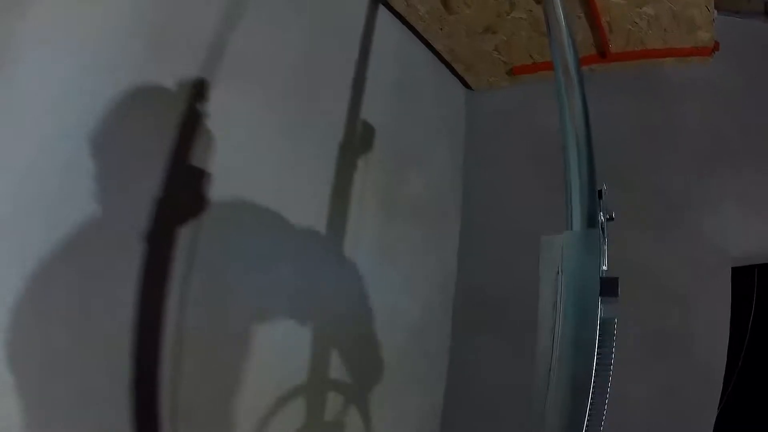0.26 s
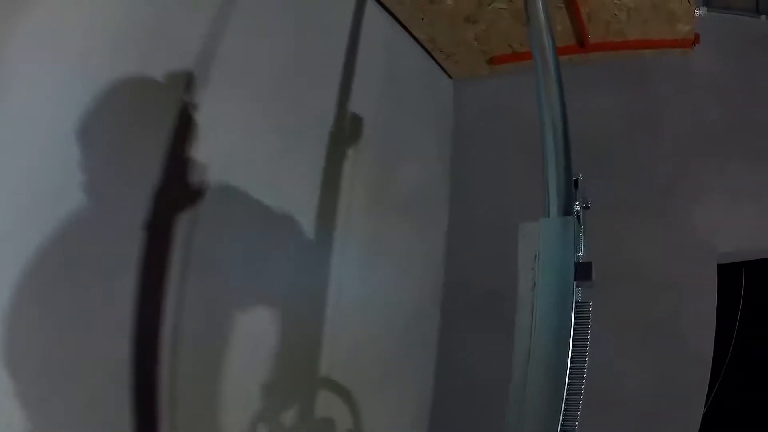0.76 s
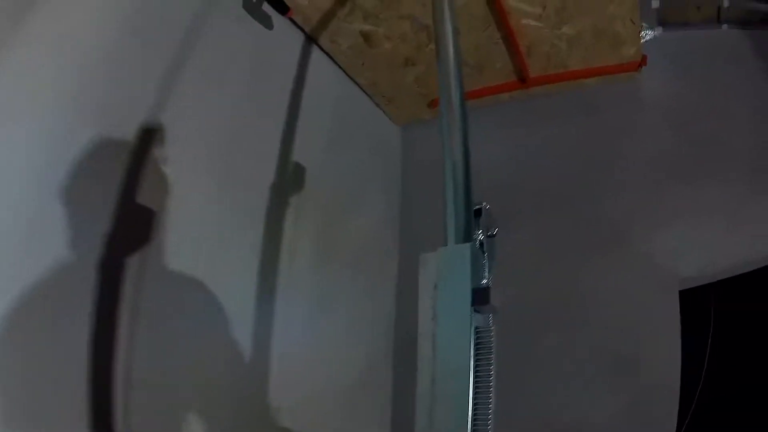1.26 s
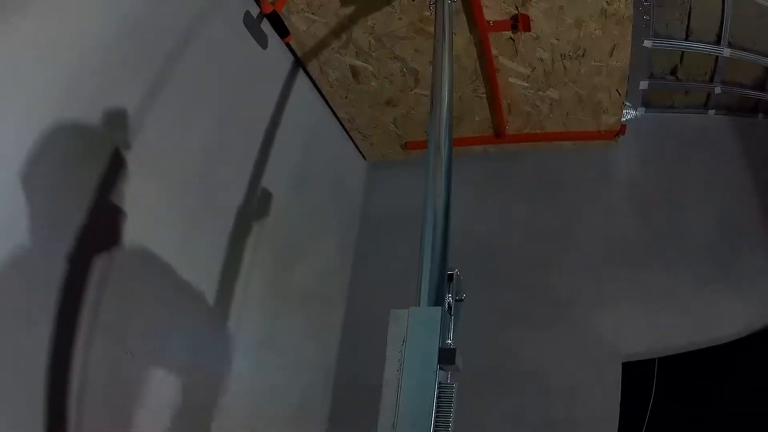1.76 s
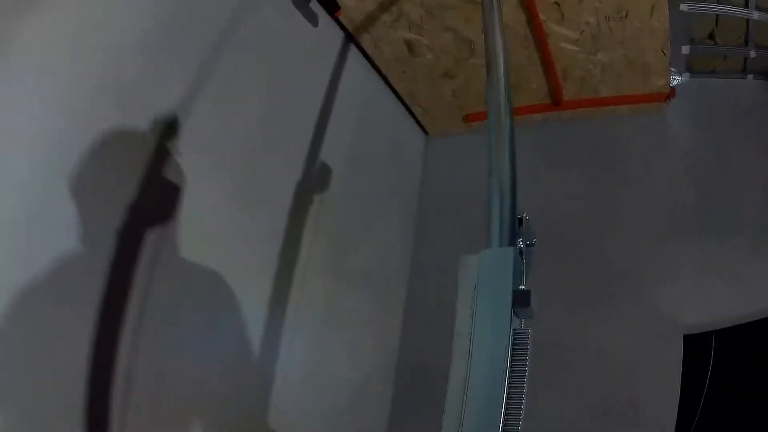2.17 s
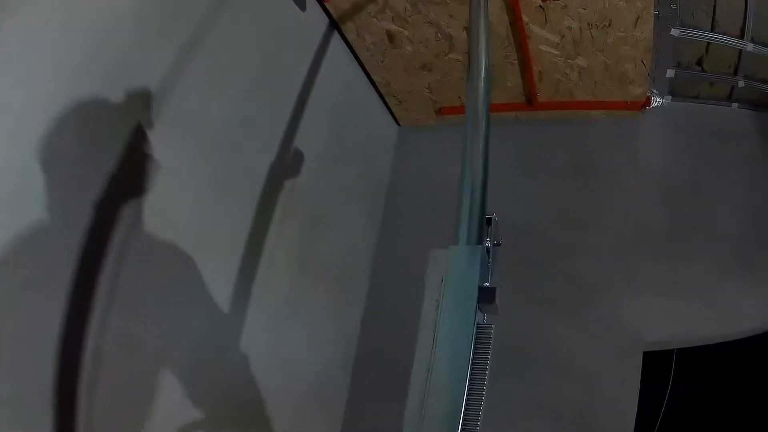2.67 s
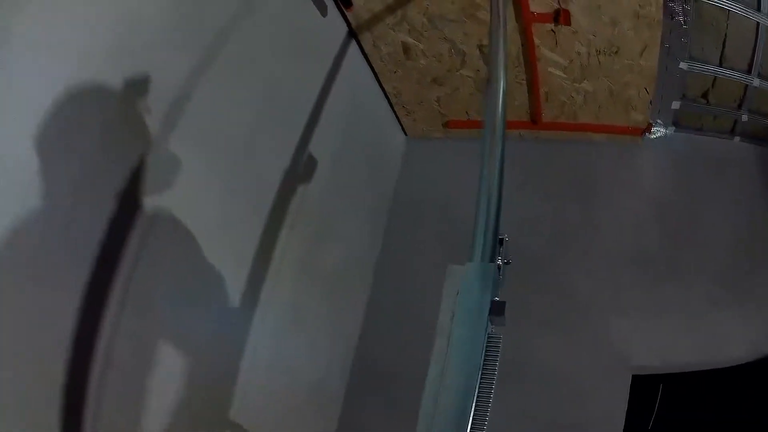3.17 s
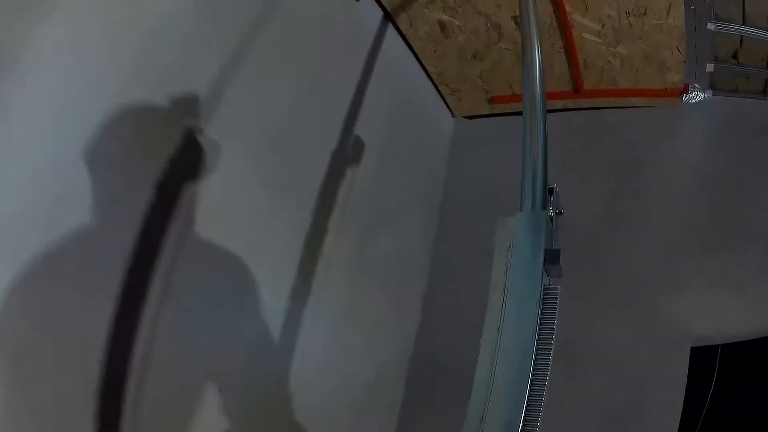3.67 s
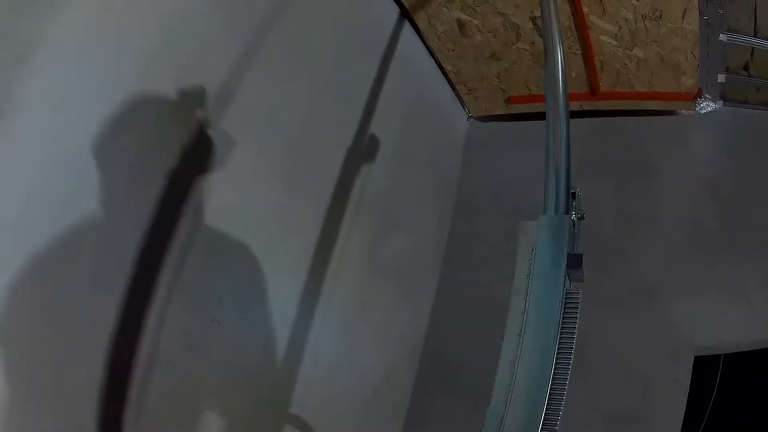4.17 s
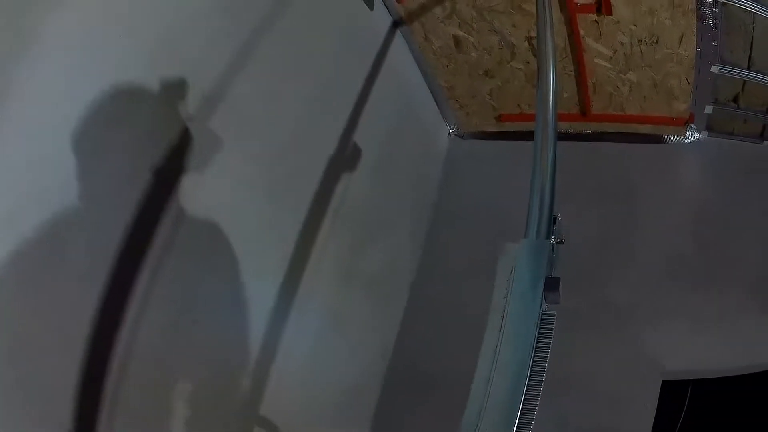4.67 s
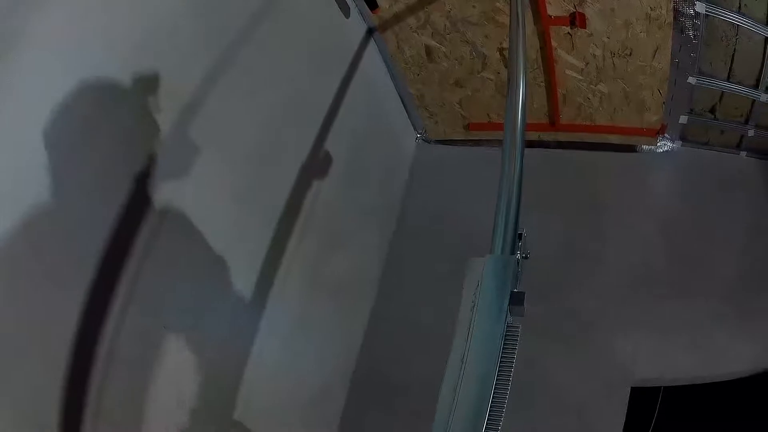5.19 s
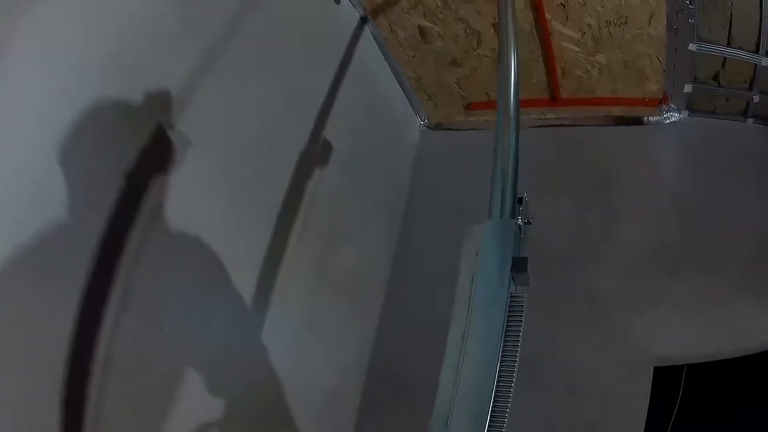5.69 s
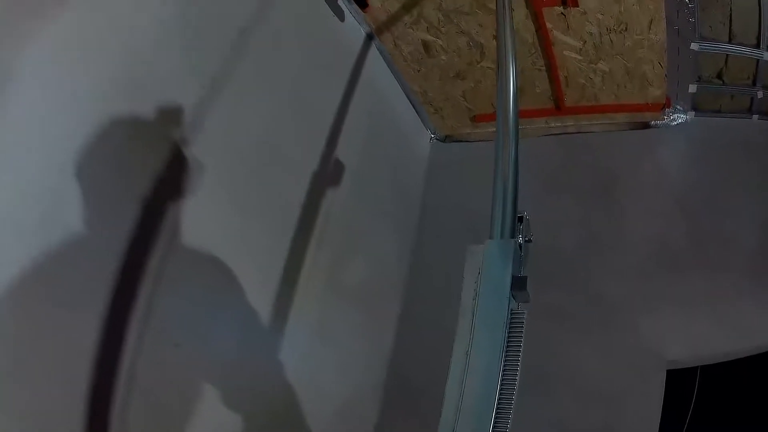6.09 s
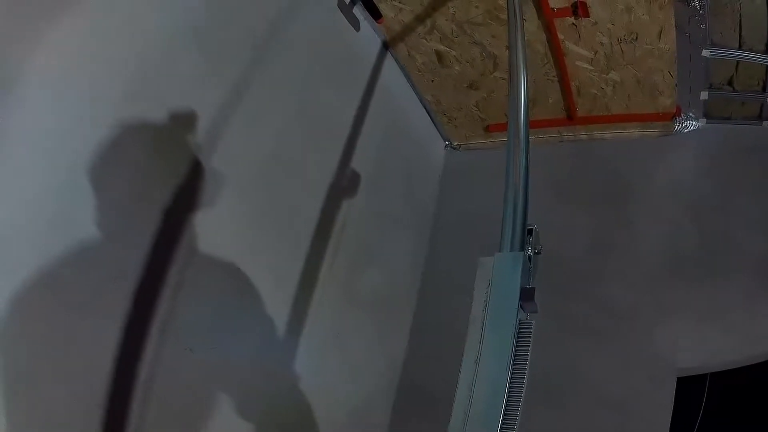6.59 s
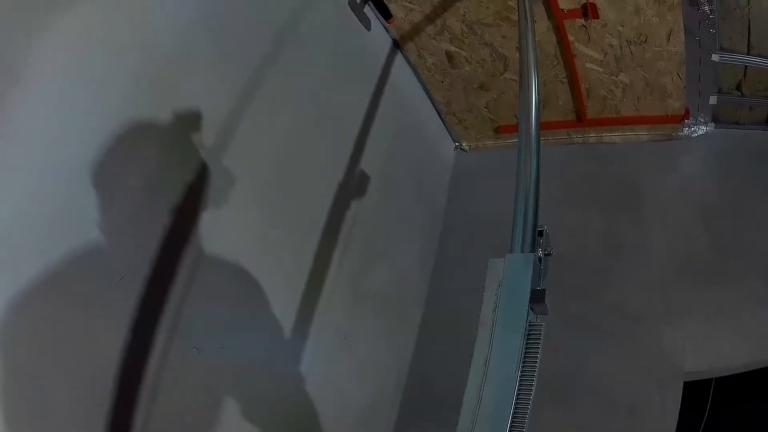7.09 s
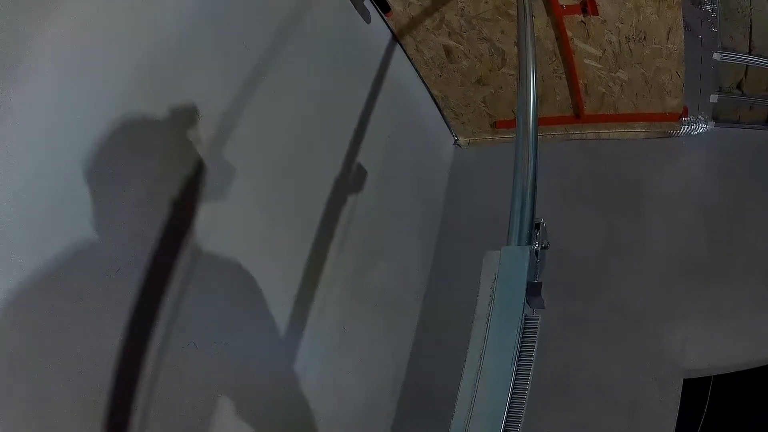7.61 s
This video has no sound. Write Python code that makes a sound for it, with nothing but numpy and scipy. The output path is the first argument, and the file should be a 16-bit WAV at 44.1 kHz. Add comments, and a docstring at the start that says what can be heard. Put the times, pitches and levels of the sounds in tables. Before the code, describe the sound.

Fast, ringing steel clicks come from the ratchet of a hand-cranked panel lift, with a rattling clack from its mast that gradually grows thinner. The long run stops, a few metal parts knock and the lift hums briefly, then the ratchet runs once more for a moment. Bare garage walls echo the metal sounds. The ending is quiet, with light ticks, sleeves brushing near the microphone and dull bumps of hands.

```python
"""A panel lift's hand winch, cranked in a bare garage: one long run, one short.
At each ratchet tooth the steel pawl and wheel ring, the mast clacks and its tube taps the sleeve.
The clack thins as the mast runs out. Loose parts knock, the bumped frame hums and small ticks sound.
The walls reverberate these; thumps of hands, rubbing cloth and faint air noise stay dry."""
import sys
import numpy as np
from scipy import signal
from scipy.fft import rfft, irfft, next_fast_len
from scipy.io import wavfile

SR = 44100
rng = np.random.default_rng(int(sys.argv[2]) if len(sys.argv) > 2 else 0)


def bounce(signal):
    """Save signal as a 16-bit WAV file at the path given by the first command-line argument."""
    frames = np.transpose(np.atleast_2d(signal))
    limited = np.clip(frames, -1, 1)
    pcm = np.round(limited * 32767).astype(np.int16)
    wavfile.write(sys.argv[1], SR, pcm)


N = 346185

# Still air spectrum: f/Hz, level/dB
AIR_SPECTRUM = [(30, -5), (200, -14), (750, -15), (1500, -22.5), (15500, -28)]
# Pawl drops; the landing spot sets what rings most: t/s, lower wheel mode/dB, upper mode/dB, pawl/dB
PAWL_DROPS = [(0.002, -35.0, -33.0, -30.0), (0.035, -24.0, -35.0, -30.0), (0.09, -34.0, -19.0, -27.0),
              (0.135, -39.0, -32.0, -39.0), (0.159, -32.0, -20.0, -29.0), (0.206, -31.0, -28.0, -26.0),
              (0.257, -42.0, -26.0, -36.0), (0.293, -27.0, -19.0, -24.0), (0.328, -26.0, -27.0, -39.0),
              (0.382, -45.0, -29.0, -26.0), (0.407, -23.0, -37.0, -23.0), (0.47, -28.0, -39.0, -28.0),
              (0.506, -24.0, -33.0, -34.0), (0.536, -44.0, -36.0, -31.0), (0.575, -29.0, -33.0, -24.0),
              (0.602, -27.0, -26.0, -28.0), (0.633, -44.0, -28.0, -36.0), (0.666, -19.0, -25.0, -38.0),
              (0.704, -26.0, -31.0, -33.0), (0.749, -33.0, -46.0, -22.0), (0.778, -32.0, -23.0, -21.0),
              (0.849, -45.0, -23.0, -29.0), (0.876, -39.0, -45.0, -31.0), (0.91, -35.0, -45.0, -25.0),
              (0.94, -44.0, -26.0, -24.0), (0.972, -43.0, -26.0, -28.0), (1.036, -40.0, -22.0, -30.0),
              (1.065, -27.0, -22.0, -33.0), (1.102, -31.0, -35.0, -27.0), (1.133, -45.0, -35.0, -27.0),
              (1.175, -44.0, -33.0, -25.0), (1.201, -26.0, -38.0, -25.0), (1.225, -38.0, -45.0, -27.0),
              (1.254, -44.0, -46.0, -30.0), (1.279, -28.0, -33.0, -34.0), (1.322, -45.0, -38.0, -26.0),
              (1.355, -31.0, -36.0, -46.0), (1.387, -40.0, -41.0, -30.0), (1.416, -37.0, -29.0, -41.0),
              (1.536, -35.0, -23.0, -29.0), (1.566, -45.0, -45.0, -30.0), (1.607, -30.0, -28.0, -35.0),
              (1.653, -44.0, -44.0, -32.0), (1.703, -34.0, -31.0, -36.0), (1.763, -32.0, -24.0, -28.0),
              (1.81, -42.0, -35.0, -43.0), (1.848, -29.0, -31.0, -34.0), (1.894, -29.0, -22.0, -46.0),
              (1.947, -25.0, -27.0, -33.0), (1.997, -29.0, -30.0, -29.0), (2.056, -23.0, -24.0, -34.0),
              (2.112, -18.0, -21.0, -29.0), (2.154, -29.0, -23.0, -35.0), (2.201, -44.0, -27.0, -28.0),
              (2.229, -44.0, -40.0, -26.0), (2.254, -44.0, -31.0, -30.0), (2.288, -44.0, -41.0, -29.0),
              (2.315, -26.0, -28.0, -32.0), (2.351, -33.0, -20.0, -31.0), (2.395, -40.0, -31.0, -39.0),
              (2.432, -27.0, -25.0, -23.0), (2.473, -30.0, -25.0, -29.0), (2.516, -38.0, -34.0, -29.0),
              (2.562, -45.0, -28.0, -32.0), (2.588, -40.0, -46.0, -32.0), (2.611, -29.0, -38.0, -32.0),
              (2.648, -28.0, -28.0, -42.0), (2.702, -24.0, -30.0, -29.0), (2.732, -44.0, -39.0, -23.0),
              (2.765, -33.0, -26.0, -28.0), (2.807, -42.0, -26.0, -34.0), (2.846, -37.0, -28.0, -43.0),
              (2.888, -31.0, -28.0, -27.0), (2.921, -36.0, -22.0, -29.0), (2.951, -25.0, -22.0, -46.0),
              (2.98, -40.0, -30.0, -35.0), (3.022, -29.0, -26.0, -35.0), (3.05, -29.0, -28.0, -34.0),
              (3.082, -37.0, -29.0, -23.0), (3.124, -24.0, -28.0, -33.0), (3.151, -26.0, -32.0, -27.0),
              (3.194, -28.0, -33.0, -36.0), (3.23, -26.0, -26.0, -30.0), (3.281, -29.0, -31.0, -45.0),
              (3.311, -26.0, -26.0, -33.0), (3.353, -25.0, -42.0, -28.0), (3.399, -24.0, -33.0, -41.0),
              (3.438, -24.0, -29.0, -28.0), (3.479, -45.0, -45.0, -33.0), (3.518, -43.0, -33.0, -33.0),
              (3.555, -39.0, -35.0, -28.0), (3.58, -21.0, -20.0, -33.0), (3.605, -22.0, -24.0, -29.0),
              (3.641, -25.0, -27.0, -30.0), (3.674, -44.0, -29.0, -23.0), (3.701, -42.0, -34.0, -28.0),
              (3.738, -27.0, -25.0, -44.0), (3.764, -25.0, -29.0, -37.0), (3.811, -44.0, -41.0, -40.0),
              (3.836, -45.0, -45.0, -31.0), (3.863, -46.0, -42.0, -28.0), (3.905, -45.0, -40.0, -35.0),
              (5.097, -43.0, -36.0, -38.0), (5.139, -45.0, -35.0, -34.0), (5.168, -45.0, -42.0, -24.0),
              (5.202, -37.0, -44.0, -30.0), (5.229, -42.0, -45.0, -29.0), (5.254, -45.0, -45.0, -21.0),
              (5.279, -41.0, -46.0, -44.0), (5.302, -41.0, -33.0, -27.0), (5.327, -45.0, -46.0, -21.0),
              (5.349, -32.0, -26.0, -44.0), (5.373, -35.0, -39.0, -29.0), (5.399, -34.0, -46.0, -45.0),
              (5.424, -43.0, -33.0, -25.0), (5.451, -33.0, -30.0, -28.0), (5.477, -40.0, -41.0, -30.0),
              (5.511, -46.0, -46.0, -45.0), (5.535, -45.0, -32.0, -27.0), (5.56, -38.0, -35.0, -30.0)]
# Pawl overtones: f/Hz, level/dB, t60/s
PAWL_OVERTONES = [(6762, -30.5, .07), (7145, -32, .07), (9900, -31, .085), (10400, -36.5, .04),
                  (11820, -42.5, .09), (14720, -49, .07)]
# Mast run-out: t/s, share of raised timbre/0-1
MAST_EXTENSION = [(1.9, 0), (2.8, .25), (3, .55), (5.1, 1)]
# Hand force on the crank: t/s, level/dB
CRANK_EFFORT = [(0, -2.5), (.2, -1.3), (.4, 2.5), (.55, -.7), (.8, -2.3), (1, -1.3), (1.15, 2.2),
                (1.42, -2.3), (1.54, 2.7), (1.7, -3.5), (1.8, 1), (2.22, 1.3), (2.36, -1.3), (2.7, 2.2),
                (2.95, -2), (3.55, 1), (3.92, -.5), (5.1, -6), (5.17, -.5)]
# Clack spectrum, mast low: f/Hz, level/dB
LOW_MAST_SPECTRUM = [(40, -20), (90, -9.5), (160, -4.5), (260, -17), (620, -9.5), (770, -4.5), (1400, -4),
                     (2700, -5.5), (5400, -3.5), (8800, -17), (11000, -23), (15500, -36)]
# Clack spectrum, mast raised: f/Hz, level/dB
HIGH_MAST_SPECTRUM = [(130, -23), (450, -23), (950, -9), (1900, -15.5), (3400, -10.5), (5400, -13),
                      (8800, -26), (15500, -47)]
# Mast's outer sleeve: f/Hz, level/dB, t60/s
SLEEVE_MODES = [(765, -2, .09), (1040, -6, .08), (1374, -4, .08), (1813, -6, .08), (2681, -6, .1)]
# Mast's free length: f/Hz, level/dB, t60/s
TUBE_MODES = [(2255, 0, .03), (3520, -5, .04)]
# Garage reverberation: f/Hz, t60/s
GARAGE_DECAY = [(100, .58), (1500, .52), (5000, .45), (10000, .36), (15000, .14)]
# Hand and body contacts: t/s, relative level/dB, centre f/Hz, t60/s
BODY_THUMPS = [(.412, -43, 127.2, 0.27), (1.21, -51.5, 100, 0.8), (4.251, -50, 93, 0.8),
               (6.734, -50, 121, 0.51), (7.305, -36, 138, 0.31), (7.576, -43, 105, 0.69),
               (7.826, -40.5, 138, 0.24)]
# Loose parts colliding: t/s, level/dB, centre f/Hz, t60/s
PART_KNOCKS = [(1.919, -26, 1100, 0.13), (2.529, -36, 455, 0.16), (3.956, -38, 380, 0.06),
               (4.036, -28, 2320, 0.033), (4.38, -50, 1520, .11), (4.808, -33, 2800, 0.11),
               (4.815, -39, 800, .13), (5.583, -28.5, 280, 0.045), (5.849, -49, 652, 0.16),
               (7.834, -38.5, 3480, 0.064)]
# Frame swaying on one low mode: t/s, level/dB, f/Hz, t60/s
FRAME_HUMS = [(1.921, -41, 165, .35), (4.749, -48, 163, .3)]
# Bumped frame: f/Hz, level/dB, t60/s
FRAME_MODES = [(161, -1, .15), (277, -14, .16), (441, -16, .2), (958, -13, .15), (1017, -16, .15),
               (2625, -15, .33)]
# Small, bright ticks: t/s, level/dB
BRIGHT_TICKS = [(3.935, -24), (3.955, -28), (6.72, -50), (6.821, -44.5), (6.979, -34.5), (7.657, -39.5)]
# Cloth brushes: peak t/s, level/dB, swell sigma/s, fade sigma/s
CLOTH_RUBS = [(4.45, -64.5, 0.3, 1), (6.83, -57.5, 0.24, 0.18), (7.64, -54, 0.23, 0.18)]
# Rubbing cloth spectrum: f/Hz, level/dB
CLOTH_SPECTRUM = [(200, 5.5), (1200, -3.5), (7000, -7.5), (10000, -12), (15500, -15)]

WHEEL_LOWER_HZ, WHEEL_UPPER_HZ, WHEEL_T60_S, WHEEL_GAIN_DB = 3031, 3987, .16, .4
PAWL_HZ, PAWL_T60_S, PAWL_GAIN_DB = 5010, .15, 2.1
LIFT_SHARE, MAX_GAP_S, DAMP_T60_S = .68, .05, .022  # damping starts at this share of the tooth gap
MAST_REF_DB, CLACK_GAIN_DB, SLEEVE_GAIN_DB, TAP_GAIN_DB, TAP_GROWTH_DB = -29.8, 9.7, -8.3, .5, 8
DETUNE_SHARE = .0038  # grip shifts the modes from blow to blow
CUTOFF_HZ = 15780


def amp(db):
    """dB to gain."""
    return 10 ** (np.asarray(db) / 20)


def unit_rms(x):
    """Scale to rms 1."""
    return x / np.sqrt(np.mean(x ** 2) + 1e-20)


def along(points, hz):
    """Interpolate (f/Hz, value) points on a log axis."""
    knots_hz, values = np.transpose(points)
    return np.interp(np.log(hz + 1), np.log(knots_hz + 1), values)


def filtered(x, response):
    """Apply a gain given as a function of frequency."""
    size = next_fast_len(len(x) + 8192)
    return irfft(rfft(x, size) * response(np.fft.rfftfreq(size, 1 / SR)), size)[:len(x)]


def noise(spectrum, size):
    """Coloured noise, rms 1."""
    return unit_rms(filtered(rng.standard_normal(size), lambda hz: amp(along(spectrum, hz))))


def band(centre_hz, size, octaves):
    """Noise in a bell-shaped band, rms 1."""
    bell = lambda hz: np.exp(-.5 * (np.log2((hz + 1) / centre_hz) / octaves) ** 2)
    return unit_rms(filtered(rng.standard_normal(size), bell))


def wobble(rate_hz, size):
    """Random curve through Gaussian knots."""
    knots = rng.standard_normal(int(size * rate_hz / SR) + 2)
    return np.interp(np.arange(size) * rate_hz / SR, np.arange(len(knots)), knots)


def attack(t, rise_s):
    """Exponential rise to 1."""
    return 1 - np.exp(-t / rise_s)


def fade(t, t60_s):
    """Exponential decay."""
    return amp(-60 * t / t60_s)


def bloom(t, first, delay_s, rise_s):
    """Contact onset: a first share, then a swell as bounces and the near wall join in."""
    swell = attack(np.maximum(t - delay_s, 0), rise_s)
    return attack(t, .00056) * (first + (1 - first) * swell)


def ring(modes, t, scatter_db, flutter):
    """Damped modes, varied per blow; contact chatter flutters amplitude and phase."""
    out = np.zeros(len(t))
    for hz, db, t60_s in modes:
        chatter = 1 + flutter * (wobble(220, len(t)) + 1j * wobble(220, len(t)))
        detuned_hz = hz * (1 + DETUNE_SHARE * rng.standard_normal())
        tone = np.real(chatter * np.exp(2j * np.pi * (detuned_hz * t + rng.random())))
        out += np.sqrt(2) * amp(db + rng.normal(0, scatter_db)) * fade(t, t60_s) * tone
    return out


def add(track, at_s, sound):
    """Mix in place."""
    part = track[max(0, round(at_s * SR)):][:len(sound)]
    part += sound[:len(part)]


def raised(at_s):
    """Mast run-out, 0-1."""
    return np.interp(at_s, *np.transpose(MAST_EXTENSION))


def effort_db(at_s):
    """Hand force on the crank."""
    return np.interp(at_s, *np.transpose(CRANK_EFFORT))


def air():
    """Faint, steady noise of the still garage."""
    return amp(-66.5) * noise(AIR_SPECTRUM, N)


def ratchet(drops):
    """Each pawl drop rings wheel and pawl until the next tooth lifts the pawl and damps them."""
    out, t = np.zeros(N), np.arange(SR // 14) / SR
    gaps_s = np.minimum(np.diff(drops[:, 0], append=N / SR), MAX_GAP_S)
    mean_pawl_db = drops[:, -1].mean()
    for (at_s, lower_db, upper_db, pawl_db), gap_s in zip(drops, gaps_s):
        wheel_modes = [(WHEEL_LOWER_HZ, lower_db, WHEEL_T60_S), (WHEEL_UPPER_HZ, upper_db, WHEEL_T60_S)]
        wheel = ring(wheel_modes, t, scatter_db=.85, flutter=.36)
        wheel *= bloom(t, first=.36, delay_s=.0034, rise_s=.0079)
        follow_db = .33 * (pawl_db - mean_pawl_db)  # overtones partly track the main mode
        tilt_db_per_octave = -5.7 * raised(at_s)
        overtones = [(hz, db + follow_db + tilt_db_per_octave * np.log2(hz / PAWL_HZ), t60_s)
                     for hz, db, t60_s in PAWL_OVERTONES]
        pawl_modes = [(PAWL_HZ, pawl_db + PAWL_GAIN_DB, PAWL_T60_S)] + overtones
        pawl = ring(pawl_modes, t, scatter_db=.7, flutter=.46)
        pawl *= bloom(t, first=.49, delay_s=.0058, rise_s=.0041)
        damping = fade(np.maximum(t - LIFT_SHARE * gap_s, 0), DAMP_T60_S)
        add(out, at_s, damping * (amp(WHEEL_GAIN_DB) * wheel + pawl))
    return out


def mast_clacks(drops):
    """Each drop rattles the mast's loose parts and, while the mast is low, rings its sleeve."""
    out, t = np.zeros(N), np.arange(SR // 10) / SR
    envelope = bloom(t, first=.24, delay_s=.0051, rise_s=.0046) * fade(t, t60_s=.093)
    ring_db = drops[:, 1:].max(axis=1)
    for at_s, harder_db in zip(drops[:, 0], ring_db - ring_db.mean()):
        shake_db = MAST_REF_DB + effort_db(at_s) + .2 * harder_db + rng.normal(0, 1.1)
        high = raised(at_s)
        low = 1 - high
        colour = lambda hz: amp(low * along(LOW_MAST_SPECTRUM, hz) + high * along(HIGH_MAST_SPECTRUM, hz))
        grit = rng.standard_normal(len(t)) * amp(3.2 * wobble(400, len(t)))
        add(out, at_s, amp(shake_db + CLACK_GAIN_DB) * envelope * unit_rms(filtered(grit, colour)))
        sleeve = ring(SLEEVE_MODES, t, scatter_db=3, flutter=.35)
        sleeve *= bloom(t, first=.39, delay_s=0, rise_s=.0062)
        add(out, at_s, amp(shake_db + SLEEVE_GAIN_DB) * low * sleeve)
    return out


def tube_taps(drops, swing_s=.009):
    """The tube swings over and taps its sleeve after each drop, louder as it extends."""
    out, t = np.zeros(N), np.arange(SR // 20) / SR
    for at_s in drops[:, 0]:
        tap = ring(TUBE_MODES, t, scatter_db=2, flutter=.38) * attack(t, .004)
        tap_db = MAST_REF_DB + effort_db(at_s) + TAP_GAIN_DB + TAP_GROWTH_DB * raised(at_s)
        add(out, at_s + swing_s, amp(tap_db) * tap)
    return out


def garage(x, wet_db, predelay_s=.007):
    """Direct sound plus wall echoes; a new tail per block, as microphone sway shifts the paths."""
    wet, block = np.zeros(N), SR // 4
    for start in range(0, N, block):
        hz, t, spectra = signal.stft(rng.standard_normal(SR * 3 // 4), SR, nperseg=256)
        decay = fade(t, along(GARAGE_DECAY, hz)[:, None])
        _, tail = signal.istft(spectra * decay, SR, nperseg=256)
        echoes = signal.fftconvolve(x[start:start + block], tail / np.linalg.norm(tail))
        add(wet, start / SR + predelay_s, echoes)
    return x + amp(wet_db) * wet


def thumps():
    """Hands and body bump lift and microphone: soft, low noise bursts."""
    out, t = np.zeros(N), np.arange(SR // 2) / SR
    for at_s, db, hz, t60_s in BODY_THUMPS:
        envelope = attack(t, .013) * fade(t, t60_s)
        add(out, at_s, amp(db + 3) * envelope * band(hz, len(t), octaves=.86))
    return out


def knocks():
    """Loose parts collide: short, unpitched bursts."""
    out, t = np.zeros(N), np.arange(SR // 2) / SR
    for at_s, db, hz, t60_s in PART_KNOCKS:
        add(out, at_s, amp(db) * fade(t, t60_s) * band(hz, len(t), octaves=1))
    return out


def frame():
    """The loose frame sways and hums twice; one bump then rings its modes."""
    out, t = np.zeros(N), np.arange(SR // 2) / SR
    for at_s, db, hz, t60_s in FRAME_HUMS:
        hum = attack(t, .0071) * ring([(hz, db, t60_s)], t, scatter_db=.5, flutter=.46)
        add(out, at_s, hum)
    bump = attack(t, .0015) * ring(FRAME_MODES, t, scatter_db=3, flutter=.42)
    add(out, at_s=4.817, sound=amp(-33.5) * bump)
    return out


def ticks():
    """Small ticks: brief, bright noise bursts."""
    out, t = np.zeros(N), np.arange(SR // 20) / SR
    for at_s, db in BRIGHT_TICKS:
        add(out, at_s, amp(db) * fade(t, t60_s=.018) * band(centre_hz=4600, size=len(t), octaves=1.2))
    return out


def cloth():
    """Shirt sleeves brush past; fibres catch and release, graining the rub."""
    envelope, t = np.zeros(N), np.arange(N) / SR
    for peak_s, db, swell_s, fade_s in CLOTH_RUBS:
        sigma_s = np.where(t < peak_s, swell_s, fade_s)
        envelope += amp(db) * np.exp(-.5 * ((t - peak_s) / sigma_s) ** 2)
    fibres = unit_rms(amp(2 * wobble(30, N) + 3.3 * wobble(700, N)))
    return envelope * fibres * noise(CLOTH_SPECTRUM, N)


def scene():
    """Mono mix: winch, knocks, frame and ticks with reverberation; thumps, cloth and air dry."""
    drops = np.array(PAWL_DROPS)
    winch = garage(ratchet(drops), wet_db=-6.5)
    winch += garage(tube_taps(drops), wet_db=-9)
    winch += garage(mast_clacks(drops), wet_db=-1.5)
    contacts = garage(knocks() + frame(), wet_db=-7.5) + garage(ticks(), wet_db=-5.5)
    return (winch + contacts + thumps() + cloth() + air())[None]


def record(dry):
    """Brick-wall low-pass."""
    return np.array([filtered(x, lambda hz: hz < CUTOFF_HZ) for x in dry])


dry = scene()
out = record(dry)
bounce(out)
```